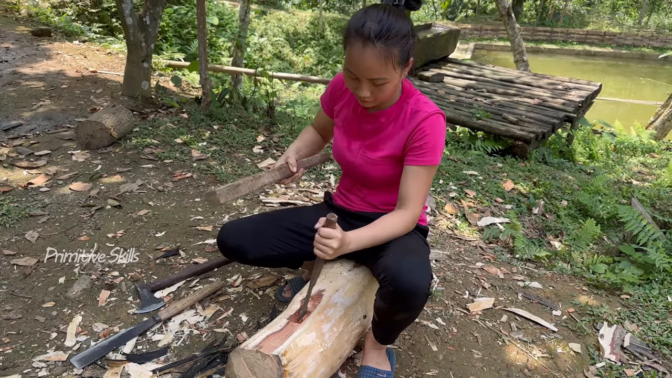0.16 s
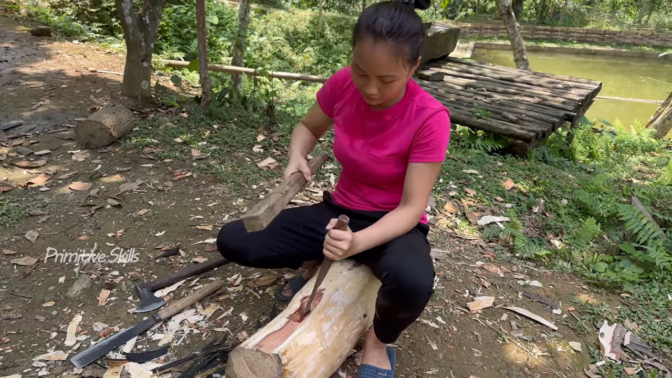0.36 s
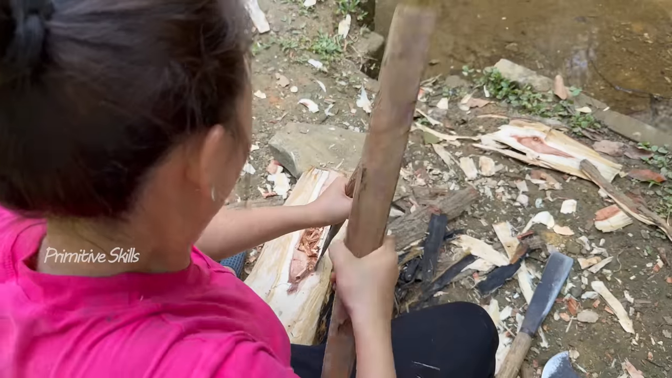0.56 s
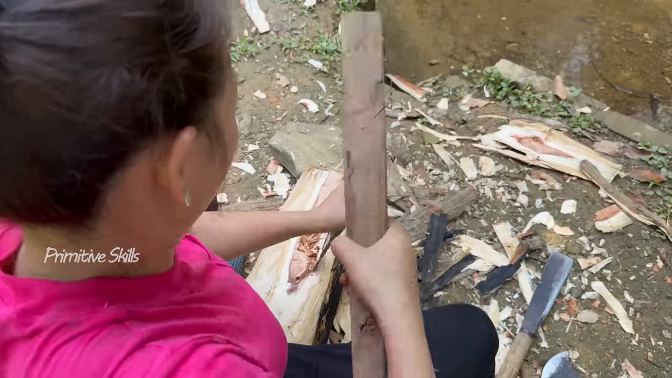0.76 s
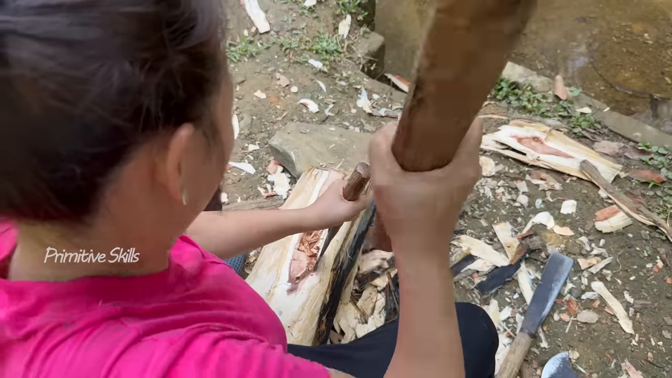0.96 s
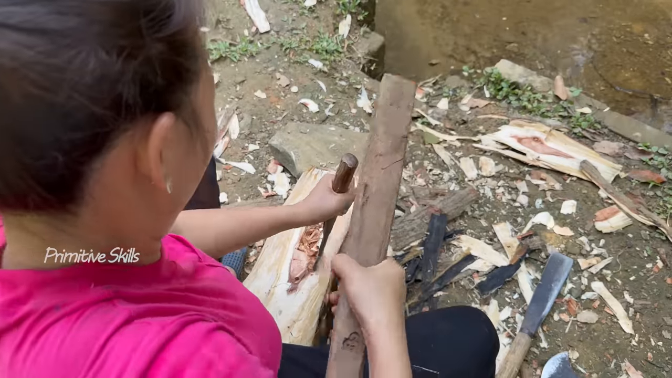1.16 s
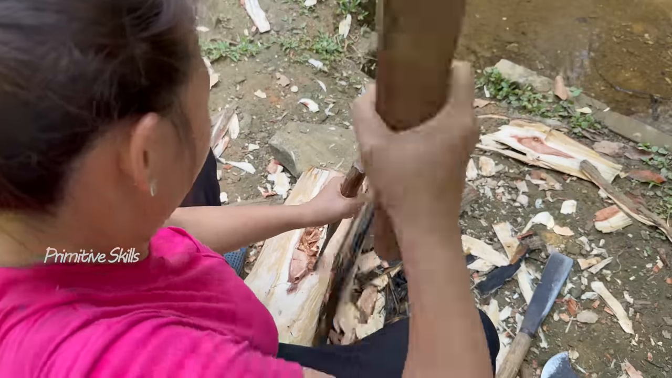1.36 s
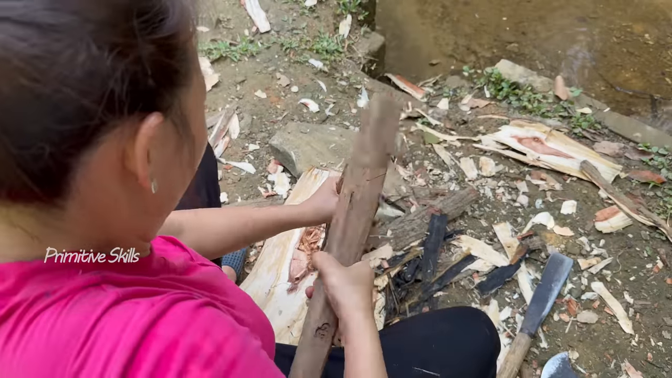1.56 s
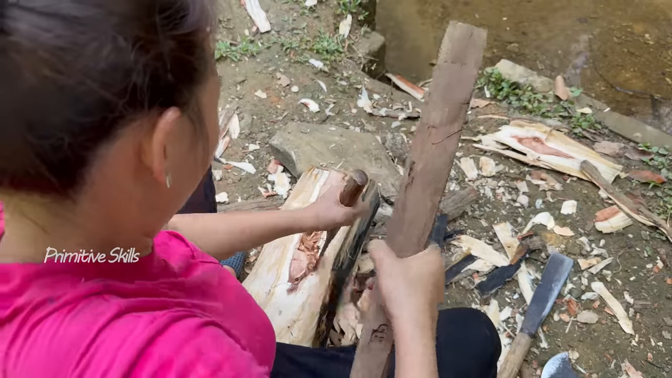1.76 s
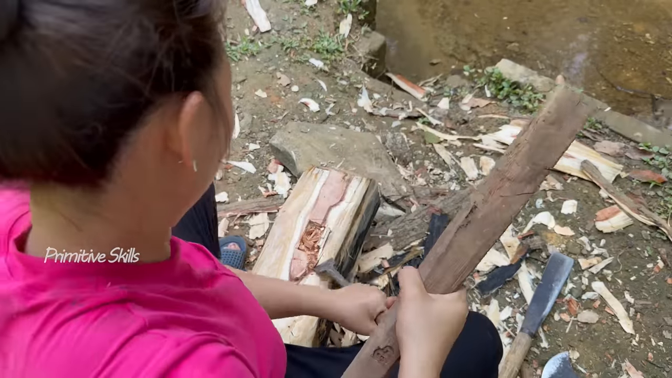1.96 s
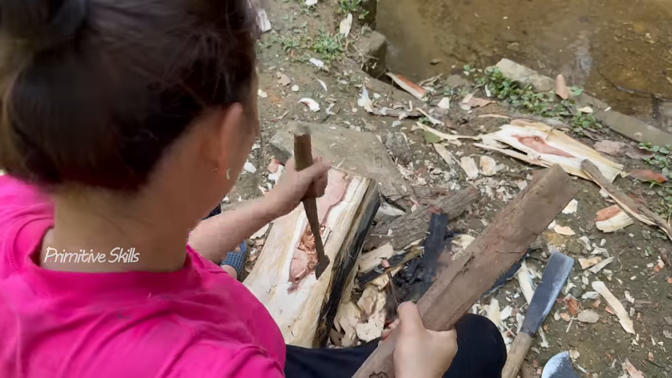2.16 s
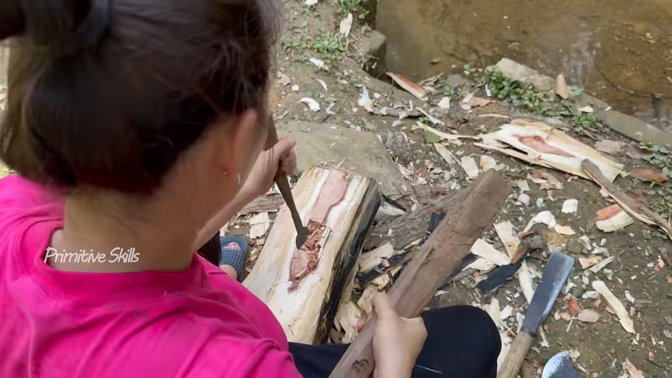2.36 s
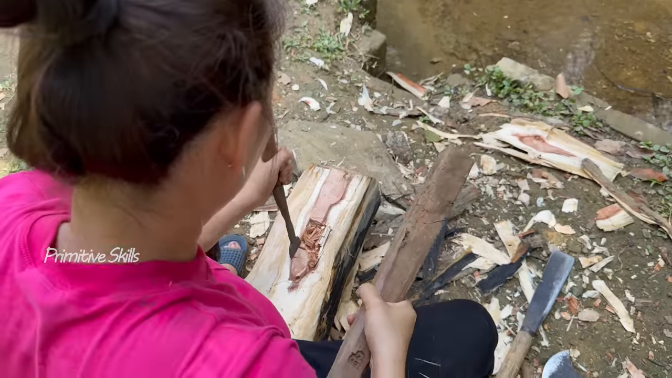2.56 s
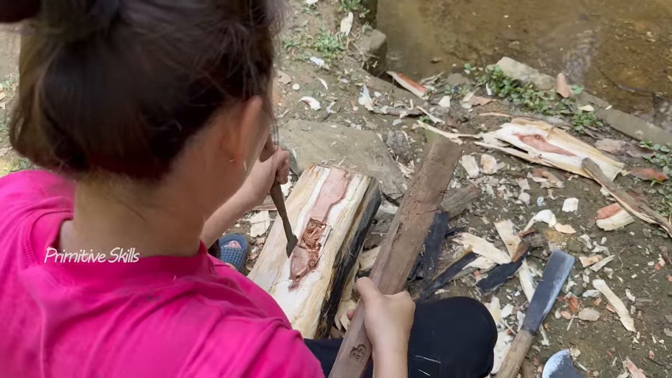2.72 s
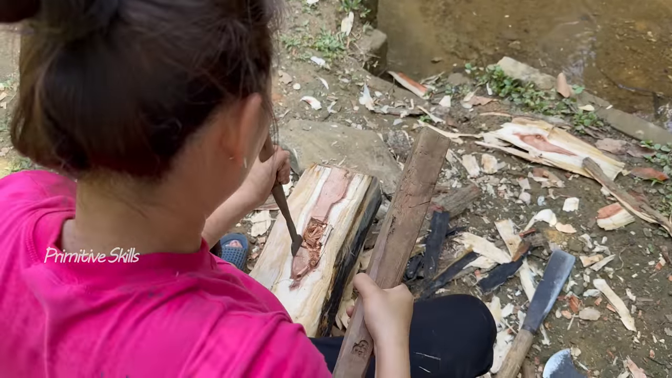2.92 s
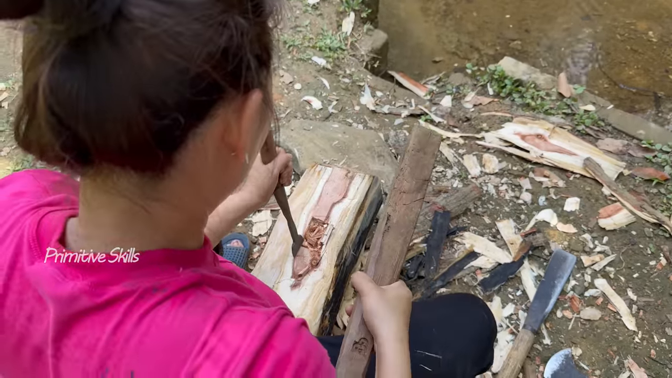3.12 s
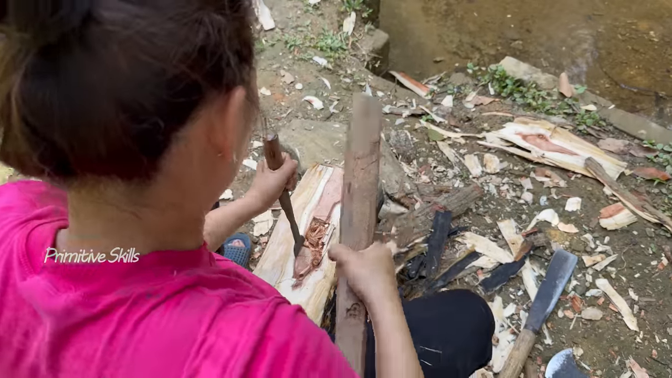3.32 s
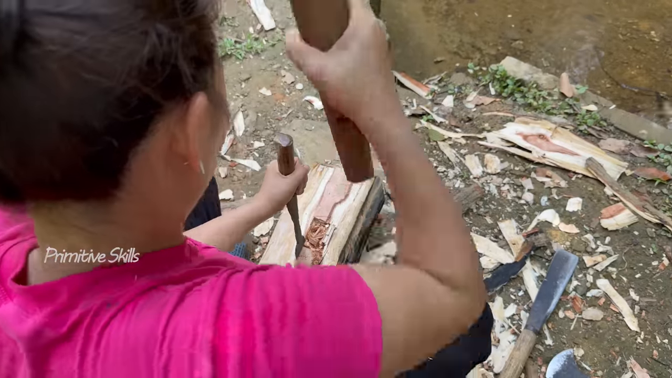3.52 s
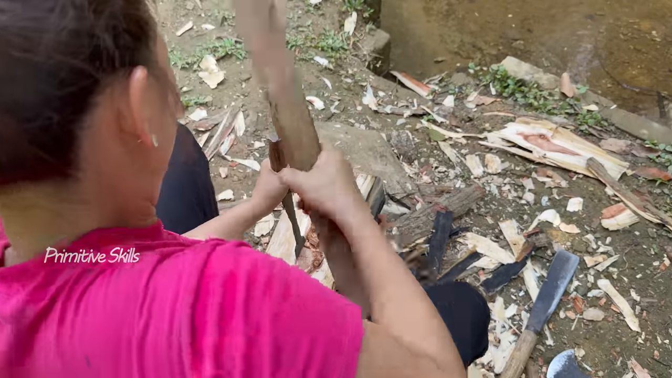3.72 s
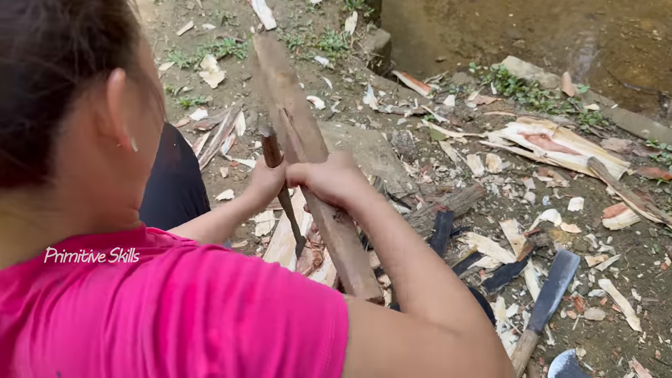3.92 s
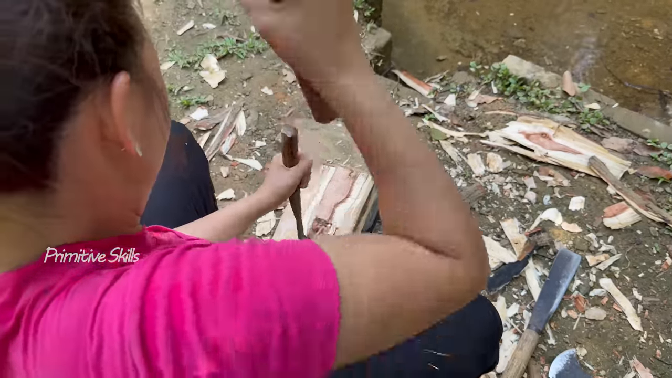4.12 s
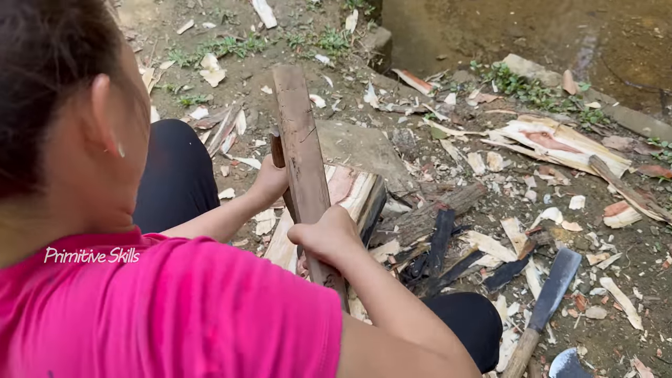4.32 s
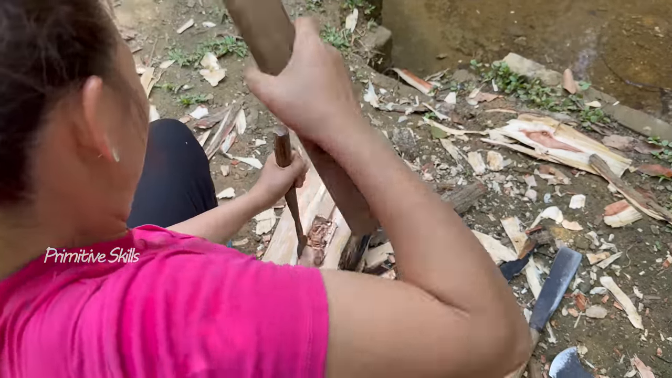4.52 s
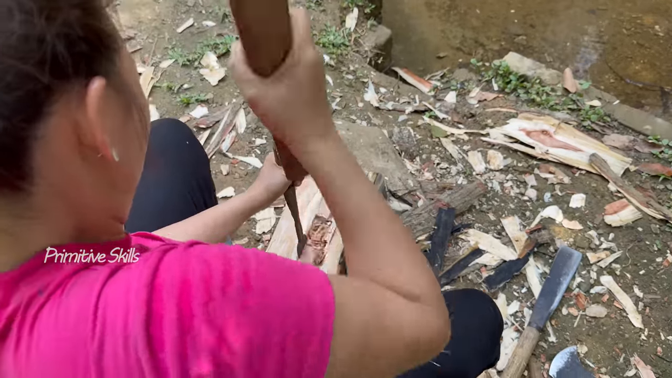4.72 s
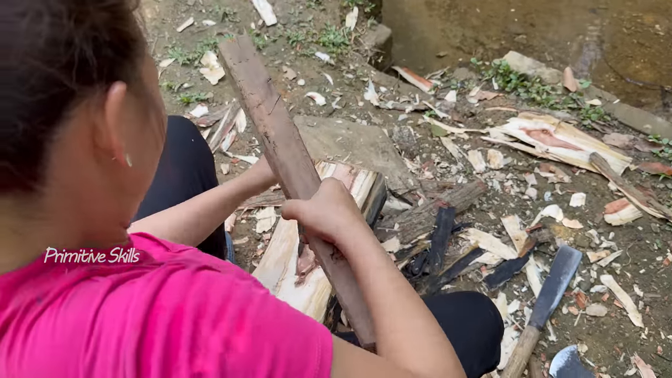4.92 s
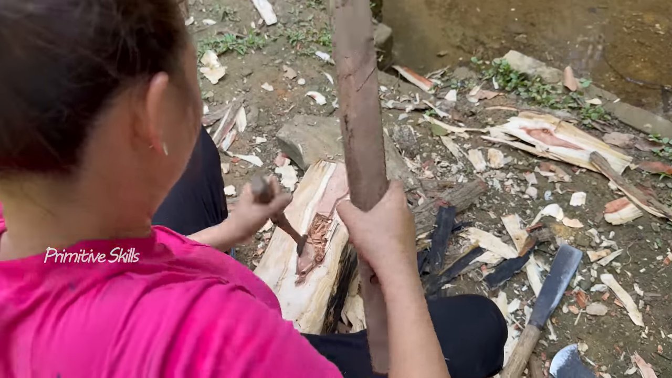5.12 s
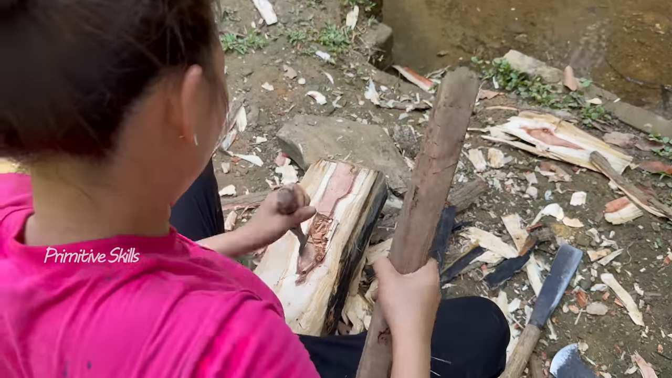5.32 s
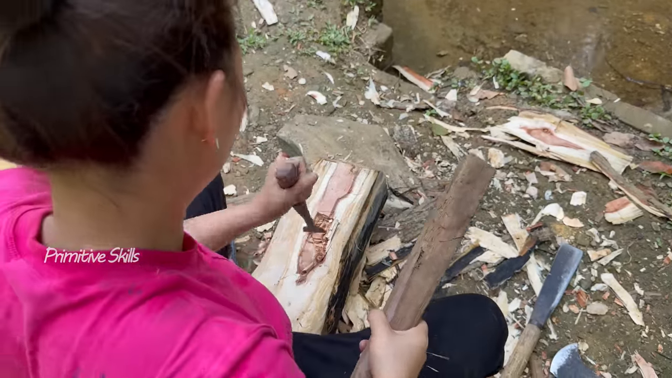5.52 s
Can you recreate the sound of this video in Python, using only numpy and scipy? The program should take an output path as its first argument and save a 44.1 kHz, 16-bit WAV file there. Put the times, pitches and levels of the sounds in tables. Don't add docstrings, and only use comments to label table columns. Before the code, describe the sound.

Lively trickling water with small bubbly plops and thin, high cicada tones opens the scene for half a second, then cuts abruptly to a much quieter background. A wooden mallet strikes a chisel in a log three times, about half a second apart. A two-second pause holds only faint hiss, rustles and tiny ticks, then three more blows follow. Close stereo microphone outdoors, with short echoes off trees.

```python
import sys
import numpy as np
from scipy import signal
from scipy.fft import rfft, irfft
from scipy.io import wavfile
from scipy.ndimage import uniform_filter1d

SR = 44100
rng = np.random.default_rng(int(sys.argv[2]) if len(sys.argv) > 2 else 0)


def magnitude_from_level(level_db):
    exponent = np.asarray(level_db, float) / 20
    return 10 ** exponent


def put_to_file(sound):
    columns = np.atleast_2d(sound).T
    safe = np.clip(columns, -1, 1)
    whole_steps = np.round(safe * 32767)
    wavfile.write(sys.argv[1], SR, whole_steps.astype(np.int16))


N = 250488


def colour(x, table):
    hz, db = np.transpose(table)
    f = np.maximum(np.arange(x.shape[-1] // 2 + 1) * SR / x.shape[-1], 1)
    gain = magnitude_from_level(np.interp(np.log(f), np.log(hz), db, left=-80, right=-80))
    y = irfft(rfft(x) * gain, x.shape[-1])
    return y / np.sqrt(np.mean(y ** 2))


def late(x, samples):
    f = np.arange(x.shape[-1] // 2 + 1) / x.shape[-1]
    return irfft(rfft(x) * np.exp(-2j * np.pi * f * samples), x.shape[-1])


def walk(rate):
    hold = int(SR / rate)
    steps = np.repeat(rng.standard_normal(N // hold + 1), hold)
    return uniform_filter1d(uniform_filter1d(steps, hold), hold)[:N]


def decay(t, t60):
    return np.exp(-np.log(1000) * t / t60)


def ring(t, hz, t60, phase):
    return decay(t, t60) * np.sin(2 * np.pi * hz * t + phase)


def gate_off(t, end_s, width_s):
    return 1 / (1 + np.exp(np.minimum((t - end_s) / width_s, 50)))


def add(out, x, s):
    i = int(s * SR)
    out[..., i:i + x.shape[-1]] += x[..., :N - i]


def bubbles(rate, low_hz, high_hz, cycles):
    out, t = np.zeros(N), np.arange(640) / SR
    for when, pitch, size in rng.random((int(rate * N / SR), 3)):
        hz = low_hz * (high_hz / low_hz) ** pitch
        level = np.sqrt(-np.log(1 - size))
        glide_hz = hz * (1 + 0.11 * hz * t / cycles)
        add(out, level * ring(t, glide_hz, cycles / hz, 0), when * N / SR)
    return out / out.std()


def pond(sum_table, diff_table, levels_db, grain_db, flicker_db):
    grains = [bubbles(200, 837, 4630, 18.9) + magnitude_from_level(-4.5) * bubbles(80, 1752, 3503, 35) for _ in range(2)]
    water = [rng.standard_normal(N) * magnitude_from_level(flicker_db * walk(60)) + magnitude_from_level(grain_db) * g for g in grains]
    mid = magnitude_from_level(levels_db[0]) * colour(water[0], sum_table)
    side = magnitude_from_level(levels_db[1]) * colour(water[1], diff_table)
    return np.array([mid + side, mid - side])


def hollow(x, bands):
    f = np.arange(N // 2 + 1) * SR / N
    gain_db = sum(db * np.exp(-((f - hz) / width) ** 2) for hz, width, db in bands)
    return irfft(rfft(x) * magnitude_from_level(gain_db), N)


def cicadas(lines, waver_hz, pan_db, spread):
    out = np.zeros((2, N))
    for hz, db in lines:
        phase = 2 * np.pi * np.cumsum(hz + waver_hz * walk(2.5)) / SR
        apart = spread * rng.standard_normal()
        swell = magnitude_from_level(db + 2 * walk(9))
        out += np.sqrt(2) * swell * np.array([np.sin(phase), np.sin(phase + apart)])
    return out * magnitude_from_level([[pan_db / 2], [-pan_db / 2]])


def top_hiss():
    # t/s, level over the hiss/dB, length/s
    rustles = [(1.089, 3, 0.013), (1.471, 5, .01), (1.837, 7, .015), (2.19, 1, .01), (2.32, 2.5, .02),
               (2.446, 2, 0.0082), (2.641, 5, 0.011), (2.804, 6.5, 0.0101), (2.95, 6, .015),
               (3.096, 2.5, .02), (5.053, 3.5, .04)]
    # f/Hz, level/dB per Hz
    hiss_colour = [(8500, -45), (10000, -4.5), (11500, -3.5), (13000, -2), (14500, -4.5), (15700, -11),
                   (16500, -35)]
    # f/Hz, lag/turns
    slip = [(8500, .1), (10000, .27), (11700, .5), (13000, .78), (14300, 1), (17000, 1)]
    t = np.arange(N) / SR
    db = 1.36 * walk(30) + sum(d * np.exp(-((t - s) / length) ** 2) for s, d, length in rustles)
    x = colour(rng.standard_normal(N) * magnitude_from_level(db), hiss_colour)
    turns = np.interp(np.arange(N // 2 + 1) * SR / N, *np.transpose(slip))
    return np.array([x, irfft(rfft(x) * np.exp(-2j * np.pi * turns), N)])


def first_standpoint(hiss):
    # f/Hz, level/dB per Hz
    sum_colour = [(24, -35.5), (40, -5), (93, -1.5), (148, -9), (252, -1.5), (402, -8), (557, -1.5),
                  (790, -4), (1200, -5), (1920, -9), (2850, 2), (3430, -4.5), (7230, -9), (8710, -3.5),
                  (10500, -11), (13600, -102.5), (22000, -120)]
    diff_colour = [(24, -44), (40, -27), (334, -18.5), (421, -15.5), (484, -15.5), (809, -14), (997, -11),
                   (1450, -12), (1830, -6), (2720, -15.5), (3770, -10), (5860, -16.5), (10500, -16.5),
                   (13600, -27), (22000, -120)]
    # sum/dB, difference/dB
    water_db = (-46, -45.5)
    # f/Hz, level/dB rms
    chorus = [(8145, -64), (8333, -72), (8457, -63), (8716, -61), (8812, -68), (8904, -67), (9028, -67),
              (9292, -71), (9862, -70), (10180, -72)]
    water = pond(sum_colour, diff_colour, water_db, grain_db=-13, flicker_db=1.5)
    insects = cicadas(chorus, waver_hz=3.75, pan_db=0.12, spread=0.95)
    return water + insects + magnitude_from_level(-60.0) * hiss


def second_standpoint(hiss):
    # f/Hz, level/dB per Hz
    sum_colour = [(24, -62.5), (40, -8.5), (97, -3.5), (186, -3.5), (252, -1.5), (318, -6.5), (441, -1.5),
                  (544, -12.5), (847, -4), (1380, -6.5), (1750, -2), (4870, -8.5), (7070, -9.5), (8920, -6),
                  (10500, -15), (13600, -73.5), (22000, -120)]
    diff_colour = [(24, -58), (40, -38.5), (70, -17), (182, -19), (252, -15), (311, -15.5), (441, -12),
                   (570, -13.5), (641, -11.5), (1350, -7.5), (1870, -6), (2150, -10.5), (3050, -6),
                   (3950, -9.5), (10500, -12.5), (13600, -26.5), (22000, -120)]
    # sum/dB, difference/dB
    water_db = (-58.5, -60)
    # f/Hz, width/Hz, level/dB
    bank = [(1097, 93, 4), (1407, 81, -5.5), (1792, 47, 1.5), (2139, 237, -4), (2503, 246, 4),
            (6130, 548, 4), (4930, 500, 0), (7316, 613, -3.5)]
    # f/Hz, level/dB rms
    chorus = [(8043, -86), (8301, -82), (8629, -83), (8888, -82), (9222, -86), (9458, -87), (9776, -89)]
    left, right = pond(sum_colour, diff_colour, water_db, grain_db=-14, flicker_db=0.234)
    mid = hollow(left + right, bank) / 2
    side = (left - right) / 2
    insects = cicadas(chorus, waver_hz=4.1, pan_db=-2.1, spread=4.1)
    return np.array([mid + side, mid - side]) + insects + magnitude_from_level(-62.0) * hiss


def plops_and_ticks():
    # t/s, peak level/dB, f/Hz, length/cycles
    drops = [(.108, -39, 886, 15.5), (.183, -44, 523.6, 37), (.313, -29.5, 1244, 7.1),
             (.314, -32, 1700, 12.5), (.318, -38, 329, 2.86), (.478, -42.5, 731, 12), (.165, -38, 2900, 40),
             (.238, -43.5, 1120, 17.7)]
    # t/s, peak level/dB, f/Hz, length/cycles
    ticks = [(2.108, -37.5, 2504, 9), (2.188, -30.5, 3320, 6.2), (2.318, -41.5, 2480, 8.8),
             (2.631, -31, 3090, 4.4), (3.13, -34.5, 2600, 7), (4.095, -47.5, 1030, 8.9),
             (5.07, -45, 2630, 14.4), (5.19, -46, 2706, 16), (5.209, -41.5, 2590, 18.3),
             (5.30, -39.5, 2440, 12), (5.305, -39, 3003, 12)]
    out, t = np.zeros(N), np.arange(4096) / SR
    for s, db, hz, cycles in drops + ticks:
        tone = ring(t, hz * (1 + 4 * t), 3 * cycles / hz, 0)
        add(out, magnitude_from_level(db) * tone * (1 - np.exp(-t / .0005)), s)
    return np.array([out, magnitude_from_level(-3) * late(out, 4.)])


def law(rule, spot, firm, seat):
    return np.dot(rule, [1, spot, firm, seat])


def strike_rise(t):
    return (1 - np.exp(-t / 0.0002956)) ** 2


def wood_knock(t, spot, firm, seat, r):
    # t60/s, level/dB, left minus right/dB on each seat, right port lag/samples on each seat
    modes = [(0.032, -1, 4, -3.5, 2.5, 1.89), (0.00794, 5, 1, 1, -3.5, 0.51), (0.0122, -2, -7.5, 22, 6, 6),
             (0.0114, -0.33, 0, 6.5, 1, 0.32), (0.01027, 3.24, -8.5, -12, -4, 0.48),
             (0.00896, -22.5, -43.5, -7.5, 27.5, 0.51), (0.0025, -6, -2.5, -11, 2.5, 0.24),
             (0.0039, -6.5, -5.5, 0, -1, 0.33), (0.0283, -34, -17.5, 1.5, 20.5, .5)]
    pitches = [
        (1750, 770, 1300, 3010, 4310, 390, 2250, 3720, 520),
        (1790, 815, 1440, 2950, 4100, 400, 2100, 3600, 520),
    ]
    # level/dB, dB per unit of spot, dB per unit of firmness, dB added on second seat
    knock_law = [
        (-4, 0.93, -2, -0.45),
        (-8.5, -0.02, -3, -1),
        (-3.23, 4.5, -1, 2.1),
        (-11.5, 3.6, -8.5, -6),
    ]
    # left lag/samples, right lag/samples, left/dB, right/dB
    reflections = [
        [(107, 103.86, -20, -11.5), (30.88, 55.56, -6.5, -4.5)],
        [(105.2, 107.06, -8, -2.5), (31.2, 61, -7, -5.5)],
    ]
    loose_bite_s = (0.00653, 0.00252)
    rel_db = law(knock_law, spot, firm, seat)
    bite = gate_off(t, loose_bite_s[seat] * np.exp(0.557 * firm), 0.002575)
    envelope = strike_rise(t) * bite
    knock = np.zeros((2, len(t)))
    for k, (hz, (t60, mode_db, *place)) in enumerate(zip(pitches[seat], modes)):
        pan_db, lag = place[seat], place[2 + seat]
        share_db = mode_db + (rel_db[k - 1] if 0 < k <= len(rel_db) else 0)
        when = t - .0007 - np.array([[0], [lag / SR]])
        mode = ring(when, hz * (1 + r[k] / 250), t60, np.pi / 2 + r[k + 9] / 5) * envelope
        knock += magnitude_from_level(share_db + np.array([[pan_db], [-pan_db]]) / 2) * mode
    knock = signal.sosfilt(signal.butter(4, 330, "high", fs=SR, output="sos"), knock)
    bounces = [np.array([magnitude_from_level(left_db) * late(knock[0], left_lag), magnitude_from_level(right_db) * late(knock[1], right_lag)])
               for left_lag, right_lag, left_db, right_db in reflections[seat]]
    return knock + sum(bounces)


def first_crack(t, spot, firm, seat):
    # level/dB, dB per unit of spot, dB per unit of firmness, dB added on the second seat
    crack_law = (-13.5, 1.8, 9.5, -1.5)
    crack_colour = [(3000, -8.5), (4800, 7.0), (6500, 2.5), (9000, 8), (13000, -29), (15500, -0.5), (16700, -47)]
    crack = colour(rng.standard_normal(len(t)), crack_colour)
    return magnitude_from_level(law(crack_law, spot, firm, seat)) * crack * strike_rise(t) * np.exp(-t / 0.00125)


def log_ring(t, spot, firm, seat, r):
    # t60/s, level/dB
    rings = [(0.139, -21), (0.16, -34), (0.309, -35), (0.194, -28), (0.0875, -28.5), (0.308, -40),
             (0.465, -44), (0.16, -38)]
    pitches = [
        (790, 1115, 1793, 3020, 318, 2186, 1755, 2945),
        (791, 1082, 1857, 2961, 360, 1992, 1775, 3075),
    ]
    # level/dB, dB per unit of spot, dB per unit of firmness, dB added on second seat
    ring_law = [
        (1.5, -7, -6, -1),
        (0.93, 3, 5.44, 2.53),
        (-3, 3.37, 3.5, 1.5),
        (-0.49, 0.5, -2, -5),
    ]
    family = [0, 1, 2, 3, 3, 2, 2, 3]
    hollow_hz = (1098.8, 1068.3)
    hollow_law = (-22, 5, -1.28, 0.9)
    after_db = law(ring_law, spot, firm, seat)
    settle = gate_off(t, 0.069, 0.01)
    log = np.zeros((2, len(t)))
    for k, (hz, (t60, db)) in enumerate(zip(pitches[seat], rings)):
        phase = r[k] + np.array([[0], [hz / 1400]])
        tone = ring(t, hz * (1 + r[k + 18] / 300), t60, phase)
        log += magnitude_from_level(db + after_db[family[k]]) * tone * (settle if k == 0 else 1)
    late_s = .012
    voice = ring(t - late_s, hollow_hz[seat] * (1 + r[27] / 100), 0.0618, r[28])
    voice = voice / (1 + np.exp((late_s - t) / 0.0016))
    return log + magnitude_from_level(law(hollow_law, spot, firm, seat)) * voice


def ground_thump(t):
    glide = np.sin(2 * np.pi * (63 * t + 3.073 * (1 - np.exp(-t / 0.00589))))
    swell = 1 - np.exp(-(t / 0.0087) ** 2)
    thump = glide * swell * (np.exp(-t / 0.00717) + 0.142 * np.exp(-t / .035))
    return magnitude_from_level([[-24], [-25]]) * np.array([thump, late(thump, 35.7)])


def splinters(t, seat, t60=0.48, end_s=0.0835):
    tear_db = (-46.5, -43)
    grit = rng.standard_normal((2, len(t))) * magnitude_from_level(1.5 * rng.exponential(size=len(t)))
    grit = colour(grit, [(1500, -2), (3500, 1.76), (6000, 0.5), (8000, -14), (11000, -36.5)])
    return magnitude_from_level(tear_db[seat]) * grit * decay(t, t60) * gate_off(t, end_s, 0.0053)


def trees(t, onset_s=0.0059, t60=0.1516, edge_s=0.122, far_db=-16, far_t60=0.677):
    # f/Hz, level/dB
    echo_colour = [(150, 17.5), (500, -2.5), (1000, -0.5), (2000, 3.5), (3200, 1.5), (5000, -10),
                   (8000, -8), (16000, -41)]
    # t/s, one row for each seat
    slap_s = [
        (0.0318, 0.0595, 0.0955),
        (0.0307, 0.0654, 0.0978),
    ]
    slap_db = (-13, -13.5, -26)
    sizes = magnitude_from_level(3 * rng.standard_normal((2, len(t))))
    echoes = colour(rng.standard_normal((2, len(t))) * sizes, echo_colour)
    grove = decay(t, t60) * gate_off(t, edge_s, 0.0059)
    dense = (grove + magnitude_from_level(far_db) * decay(t, far_t60)) * (t > onset_s)
    slaps = [sum(magnitude_from_level(db) * np.exp(-((t - s) / 0.0064) ** 2) for s, db in zip(lags, slap_db)) for lags in slap_s]
    return [echoes * (dense + slap) for slap in slaps]


def blows():
    strikes = [
        (0.6343, -12.5, 0.167, 0),
        (1.1199, -14, 1.46, 0.13),
        (1.585, -15, 1.21, 0.81),
        (3.7918, -12.5, -0.62, 0.66),
        (4.3158, -13, 0.54, 0.11),
        (4.8354, -12.5, -1.33, 1),
    ]
    wet_db = (-44.5, -43.5)
    out, t = np.zeros((2, N)), np.arange(1 << 14) / SR
    space = trees(t)
    chance = rng.standard_normal((len(strikes), 30))
    for (s, db, spot, firm), r in zip(strikes, chance):
        seat = int(s > 3)
        knock = wood_knock(t, spot, firm, seat, r) + first_crack(t, spot, firm, seat)
        log = log_ring(t, spot, firm, seat, r)
        wet = signal.fftconvolve(knock + magnitude_from_level(6.0) * log, space[seat], axes=1)[:, :len(t)]
        log_onset = 1 - np.exp(-t / 0.00083)
        both = magnitude_from_level(db) * (magnitude_from_level(7.0) * knock + magnitude_from_level(wet_db[seat]) * wet + magnitude_from_level(7.5) * log * log_onset)
        both += ground_thump(t) + splinters(t, seat)
        both[1] = late(both[1], 3.19)
        add(out, both, s - .001)
    return out


def scene():
    hiss = top_hiss()
    first = first_standpoint(hiss)
    second = second_standpoint(hiss)
    moved = np.arange(N) / SR > 0.5737
    return np.where(moved, second, first) + plops_and_ticks() + blows()


def band_limit(x):
    return signal.sosfilt(signal.butter(12, 16870, fs=SR, output="sos"), x)


def record(dry):
    rounded = 0.9575 * np.tanh(dry / 0.9466)
    mix = signal.sosfilt(signal.butter(4, 42, "high", fs=SR, output="sos"), rounded)
    return band_limit(mix)


dry = scene()
out = record(dry)
put_to_file(out)
```